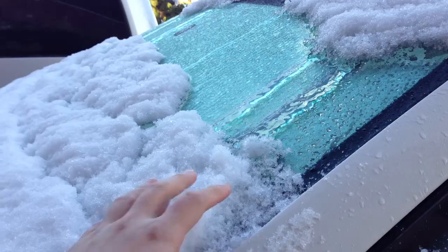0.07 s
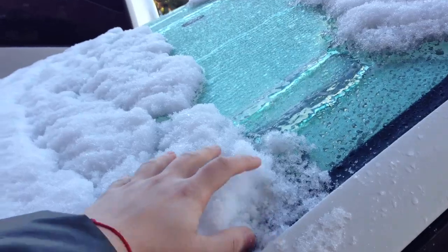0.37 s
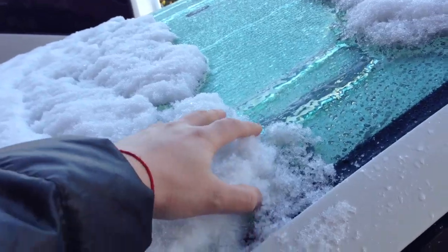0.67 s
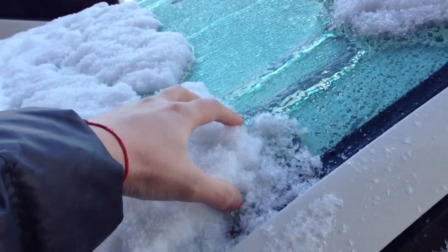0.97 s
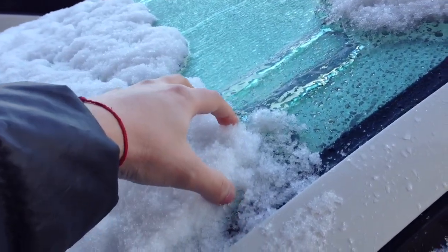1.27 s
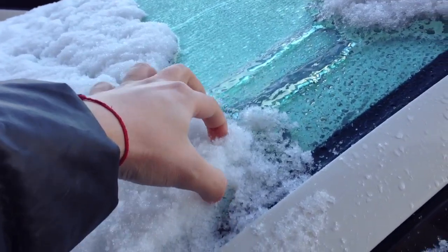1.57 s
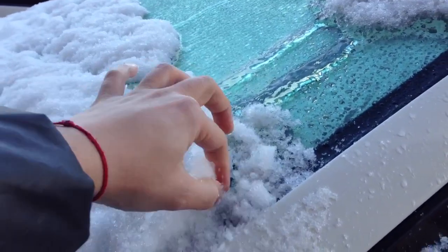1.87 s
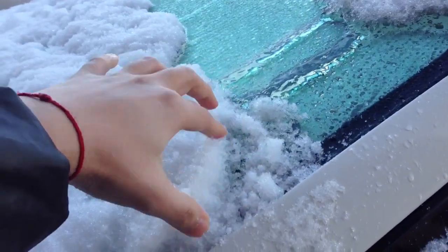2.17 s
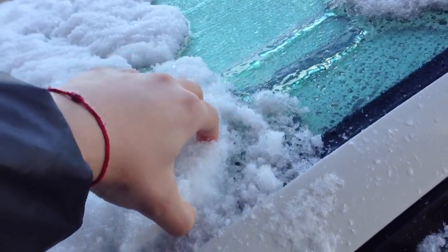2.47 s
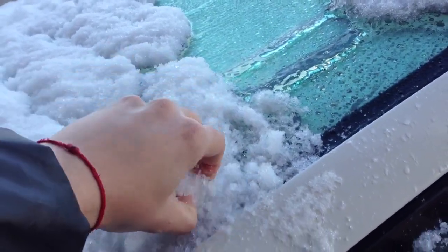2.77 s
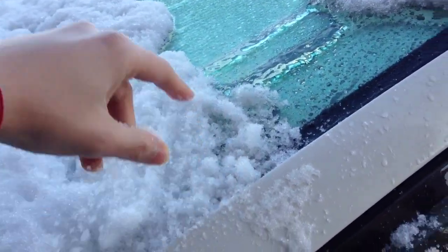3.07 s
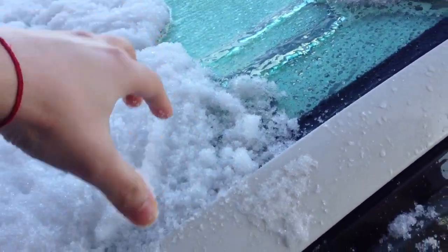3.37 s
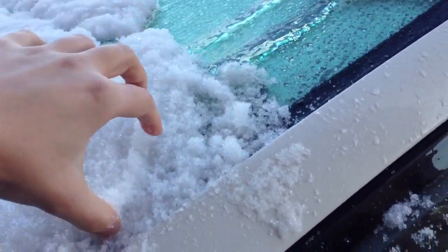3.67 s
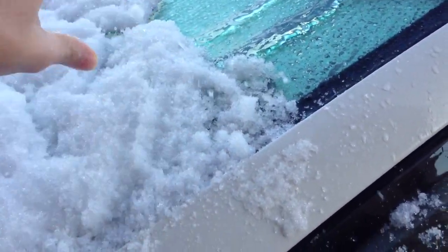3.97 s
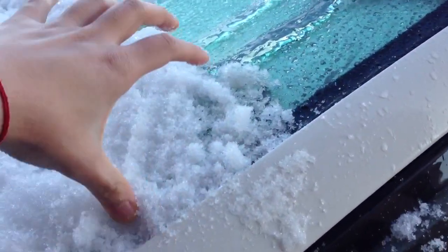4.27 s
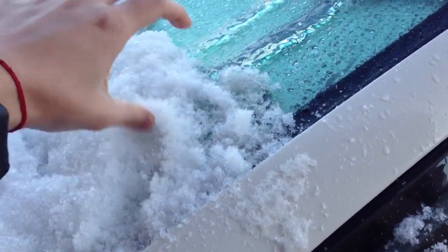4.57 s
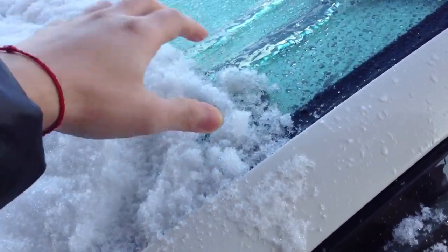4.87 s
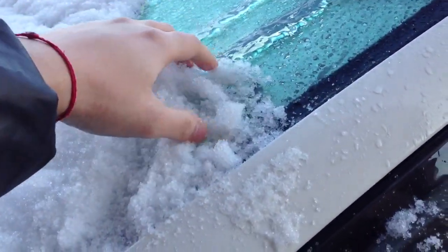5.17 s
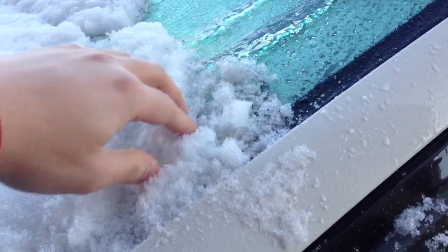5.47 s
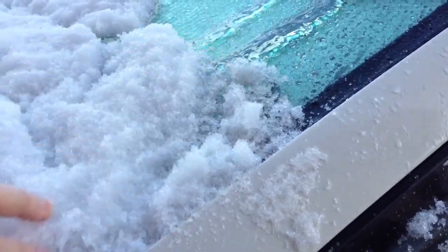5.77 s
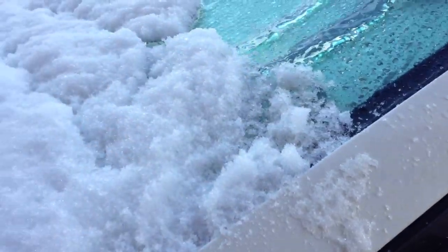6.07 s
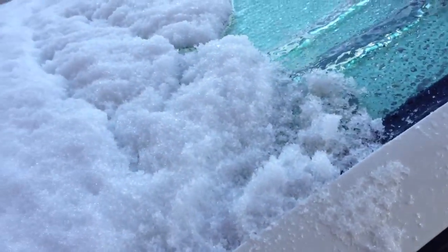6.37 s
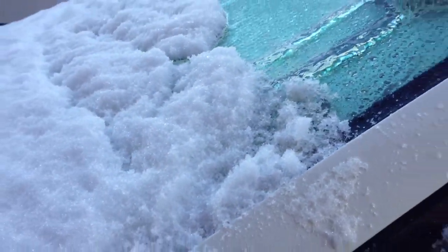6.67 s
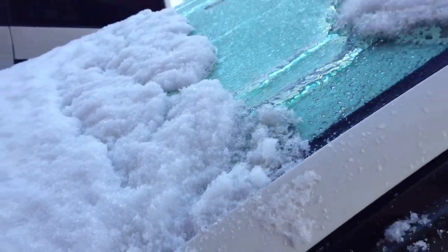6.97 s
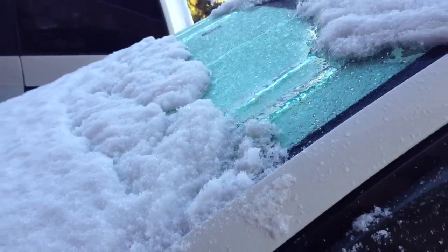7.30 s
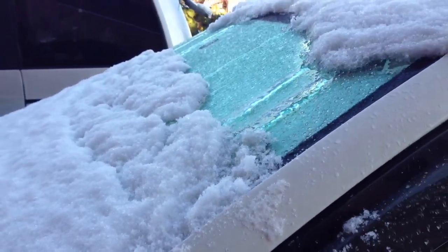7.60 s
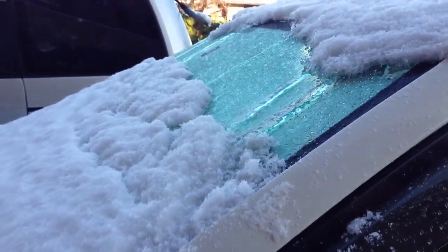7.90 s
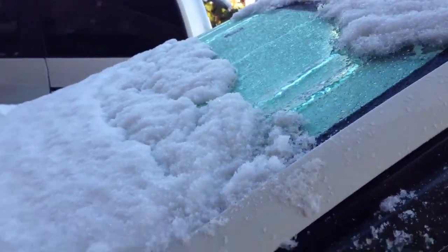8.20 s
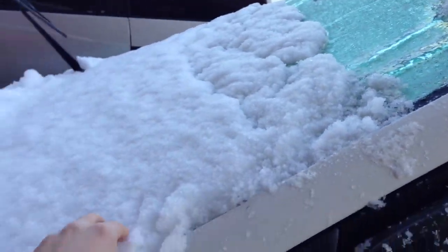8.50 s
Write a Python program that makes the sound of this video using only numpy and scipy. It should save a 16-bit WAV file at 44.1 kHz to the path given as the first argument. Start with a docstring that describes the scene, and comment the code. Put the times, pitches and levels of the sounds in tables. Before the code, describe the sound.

A distant engine hums under a low outdoor rumble while a hand, close to the microphone, claws frozen snow from a car windscreen. Crystals grind over the glass in uneven strokes, the crust snaps and crumbles, and the pane thuds softly now and then. A last few crackles follow before the hand lifts, leaving a quiet sleeve swish and two faint, far whines over the rumble.

```python
"""Bare fingers claw crusty snow and ice off a car windscreen, outdoors and close by.
From the start a distant engine idles in a low rumble, and each stroke grinds loose crystals over the glass.
Soon the crust snaps and crunches, the palm packs soft snow and the pane thuds under the hand.
From about 2 seconds on, a few flakes ring as they break off. Near 6.7 seconds the hand leaves the snow;
a sleeve rustles as the arm draws back, and two faint, far whines swell."""
import sys
import numpy as np
from scipy import signal
from scipy.fft import rfft, irfft, next_fast_len
from scipy.io import wavfile

SR = 44100
rng = np.random.default_rng(int(sys.argv[2]) if len(sys.argv) > 2 else 0)


def inscribe(sig):
    """Save sig as 16-bit PCM at rate SR to the path in sys.argv[1].

    A 1-D sig is mono; a 2-D sig holds one channel per row.
    Samples are clipped to [-1, 1] before scaling.
    """
    pcm = np.round(np.clip(np.atleast_2d(sig).T, -1, 1) * 32767)
    wavfile.write(sys.argv[1], SR, pcm.astype(np.int16))


N = 376613
TIME = np.arange(N) / SR
TOP_HZ = 15550  # upper edge of the sound


def amp(db):
    """Turns decibels into a gain."""
    return 10 ** (np.asarray(db) / 20)


def unit_rms(x):
    """Scales a signal to an average power of 1."""
    return x / np.sqrt(np.mean(x ** 2) + 1e-20)


def over_time(rows):
    """Joins timed values with straight lines."""
    return np.interp(TIME, *np.transpose(rows))


def tone_gain(tone, hz):
    """Reads gains from rows of frequency and dB, on a log-frequency axis."""
    row_hz, db = np.transpose(tone)
    return amp(np.interp(np.log(hz + 1), np.log(row_hz + 1), db))


def coloured(x, tone):
    """Gives a signal a tone colour, at power 1."""
    size = next_fast_len(N)
    gain = tone_gain(tone, np.fft.rfftfreq(size, 1 / SR))
    return unit_rms(irfft(rfft(x, size) * gain, size)[:N])


def wander(hz):
    """A smooth random wobble, up to about the given rate."""
    size = next_fast_len(N)
    smooth = np.exp(-(np.fft.rfftfreq(size, 1 / SR) / hz) ** 2)
    return unit_rms(irfft(rfft(rng.standard_normal(size)) * smooth, size)[:N])


def swells(rows):
    """The gain of soft swells that each rise and fall in a bell shape."""
    return np.sqrt(sum((amp(db) * np.exp(-((TIME - s) / half) ** 2)) ** 2 for s, half, db in rows))


def shortest_click(gain):
    """The shortest click with this spectrum (minimum phase), at energy 1."""
    cepstrum = irfft(np.log(np.maximum(gain / gain.max(), 1e-5)))
    half = len(cepstrum) // 2
    cepstrum[1:half] *= 2
    cepstrum[half + 1:] = 0
    click = irfft(np.exp(rfft(cepstrum)))[:half]
    return click / np.linalg.norm(click)


def fractures(per_s, spread_db):
    """Tiny random cracks of uneven size, at power 1."""
    chance = np.clip(per_s / SR, 1e-4, 1)
    size = unit_rms(amp(spread_db * np.minimum(rng.exponential(1, N), 3.5)))
    return size * rng.choice([-1., 1.], N) * (rng.random(N) < chance) / np.sqrt(chance)


def add(mix, start_s, sound):
    """Mixes a sound in at the given time."""
    part = mix[round(start_s * SR):][:len(sound)]
    part += sound[:len(part)]


# The engine's hum. Each row: pitch in Hz, level in dB compared with the rumble.
ENGINE_TONES = [(88, -26.5), (176, -10.5), (354, -15)]

def idling_engine(waver=0.0127, throb_db=3.0):
    """The engine's speed wavers, bending all its tones together; each throbs on its own."""
    engine_time = np.cumsum(1 + waver * wander(7.4)) / SR
    return sum(amp(db) * unit_rms(amp(throb_db * wander(3.5)) * np.sin(2 * np.pi * hz * engine_time))
               for hz, db in ENGINE_TONES)


# The tone of the outdoor rumble and of the hiss. Each row: frequency in Hz, relative level in dB.
RUMBLE_TONE = [(25, -22), (60, -35), (100, -23), (125, -15.5), (150, -1), (210, 2), (260, -5), (350, -9),
               (500, -12), (700, -16), (1000, -20), (1600, -23.5), (4000, -70)]
HISS_TONE = [(300, -20), (1500, 2.5), (4000, 6), (8000, -1), (15500, -11)]
# How loud the rumble is. Each row: time in seconds, level in dB.
RUMBLE_LEVEL = [(0, -55.5), (2, -53.7), (4, -53.5), (6, -54), (7.2, -55), (8.54, -54)]

def outdoors(hiss_db=-61.5, swell_db=1):
    """A low rumble with the distant engine in it, and a thin hiss."""
    rumble = coloured(rng.standard_normal(N), RUMBLE_TONE) * amp(swell_db * wander(9.0))
    engine = idling_engine()
    hiss = coloured(rng.standard_normal(N), HISS_TONE) * amp(hiss_db)
    return (rumble + engine) * amp(over_time(RUMBLE_LEVEL)) + hiss


# Far whines. Each row: pitch in Hz, width in Hz, resting level in dB,
# then the swell's middle in seconds, half-length in seconds and level in dB.
WHINES = [(860, 60, -72.5, 6.95, .25, -67), (1420, 70, -74, 7.6, .52, -66.5)]

def far_whines():
    """Two fuzzy whines sound faintly all along, and each swells once."""
    out = np.zeros(N)
    for hz, width, rest_db, *swell in WHINES:
        fuzz = wander(width) + 1j * wander(width)
        fuzz /= np.sqrt(abs(fuzz) + 1e-9)  # the pitch wavers more than the level
        whine = unit_rms((fuzz * np.exp(2j * np.pi * hz * TIME)).real)
        out += np.hypot(amp(rest_db), swells([swell])) * whine
    return out


def shifting_snow(band_db=(-72.5, -68.5, -64.5), lift_s=6.65, flutter_db=2):
    """Snow whispers under the hand until it lifts. Gives force in low, middle and high bands."""
    touching = np.clip((lift_s - TIME) * 10, 0, 1)
    cracks = fractures(per_s=20000, spread_db=2)
    return amp(band_db)[:, None] * touching * cracks * amp(flutter_db * wander(14))


# Finger strokes. Each row: start in seconds, length in seconds, level halfway in dB, rise from start
# to end in dB, then low body and high fizz, both in dB compared with that level.
STROKES = [(0.077, 0.15, -58, -0.5, -7, -8), (0.206, 0.05, -52.5, -4, -5, 1.5),
           (.385, 0.17, -57.5, -8, -7.5, -1.5), (0.605, 0.26, -58, -3.5, -1, 0.5),
           (0.918, .21, -65.5, -4, 6, 0), (1.497, 0.1, -54.5, 4, -3, 2.5),
           (1.808, 0.045, -45, -13, -3.5, 1), (1.897, 0.084, -46.5, 5.5, -12, 1.5),
           (1.98, 0.33, -56, -7.5, -14, 2.5), (2.254, 0.37, -53.5, 12.5, -6.5, 2.5),
           (2.574, 0.309, -44.5, 4.5, -6.5, 2), (2.923, 0.1, -44.5, -1.5, -11, 1),
           (3.063, 0.51, -56, -9.5, -15, 2), (3.756, 0.06, -51, 5, -5, -1),
           (3.843, 0.035, -35, 7, -10.5, -2), (3.94, 0.13, -63, 2, -2, 1.5),
           (4.294, 0.067, -50.5, -8, -27, 0), (4.512, 0.072, -38, 13, -12, -3),
           (4.576, 0.078, -31, 4, -11.5, 0), (5.028, 0.043, -59.5, -2, -8, 3.5),
           (5.208, 0.055, -61, 3, -6, 5.5), (5.358, 0.15, -44.5, 5, -3.5, 3.5),
           (5.503, 0.475, -49.5, -6.5, -8.5, 2)]

def finger_strokes(attack_s=0.013, release_s=0.0081, broadening=0.27):
    """Each stroke bites, swells or eases, then dies as the fingers lift. Gives force in three bands."""
    power = np.zeros((3, N))
    for start, length, db, rise_db, body_db, fizz_db in STROKES:
        span = slice(round(start * SR), round((start + length + 8 * release_s) * SR))
        age = np.maximum(TIME[span] - start, 0)
        contact = np.minimum(age / attack_s, 1) * np.exp(-np.maximum(age - length, 0) / release_s)
        push_db = rise_db * (np.minimum(age / length, 1) - .5)
        extra_db = broadening * push_db  # bearing down favours body and fizz
        band_db = np.array([body_db + extra_db, np.zeros(len(age)), fizz_db + extra_db])
        power[:, span] += (contact * amp(db + push_db + band_db)) ** 2
    return np.sqrt(power)


def crystals(cracks, grain_s=0.00064, pitches=17):
    """Gives every crack the short ring of its own crystal, at a random pitch."""
    age = TIME[:SR // 500]
    window = np.sin(np.pi * np.minimum(age / grain_s, 1)) ** 2
    pick, out = rng.integers(0, pitches, N), np.zeros(N)
    for k in range(pitches):
        grain = window * np.cos(2 * np.pi * TOP_HZ * (k + .5) / pitches * age)
        out += np.convolve(cracks * (pick == k), grain / np.linalg.norm(grain))[:N]
    return out * np.sqrt(2 * TOP_HZ / SR)


def grinding(force, per_s=11000, merge_db=-40, slip_hz=130, slip_db=3.5, lump_hz=25, lump_db=0.5):
    """Harder strokes crush more crystals, until single cracks merge into a hiss."""
    level_db = 20 * np.log10(force[1] + 1e-6)
    crush = amp(.5 * (level_db + 45.5))
    merged = 1 / (1 + amp(merge_db - level_db))
    grains = crystals(fractures(per_s * crush, spread_db=4))
    grit = np.sqrt(1 - merged) * grains + np.sqrt(merged) * rng.standard_normal(N)
    depth_db = slip_db / (1 + 0.84 * crush)  # light fingers stick and slip more
    slips = amp(depth_db * wander(slip_hz) - depth_db ** 2 * np.log(10) / 20)  # average power stays 1
    lumps = amp(lump_db * (1.5 - merged) * wander(lump_hz))  # the snow is uneven
    return force * grit * slips * lumps


# The tone of ice ground on glass. Each row: frequency in Hz, relative level in dB.
ICE_TONE = [(60, -40), (150, -9.5), (350, -4), (480, -7), (700, -9), (1000, -5.5), (1400, -9.5),
            (2000, -2.5), (2700, 0.5), (3400, 3), (4800, 2.5), (8000, 3), (15700, -4)]
# Where the glass rings. Each row: pitch in Hz, width in Hz, gain in dB.
GLASS_RINGS = [(1030, 26, 2), (1820, 460, -8.5), (3140, 130, -2), (3510, 89, 0), (4270, 37, -18),
               (5640, 35, -35)]
# How far the fingers have dug through the snow. Each row: time in seconds, share of bare glass.
BARE_GLASS = [(0, .1), (1.8, 0.1), (2.8, 0.43), (3.8, 1), (4.65, 1), (5.3, 0.082), (6.5, 0.15)]

def windscreen(force, body_hz=1700, fizz_hz=6500, echo_db=-11, echo_t60=0.078):
    """The snow-damped pane colours every crack and rings for a moment, most where it is bare."""
    hz = np.fft.rfftfreq(4096, 1 / SR)
    low = 1 / (1 + (hz / body_hz) ** 8)
    high = 1 - 1 / (1 + (hz / fizz_hz) ** 8)
    bands = tone_gain(ICE_TONE, hz) * np.sqrt(np.clip([low, 1 - low - high, high], 0, 1))
    ice = sum(signal.oaconvolve(part, shortest_click(band))[:N] for part, band in zip(force, bands))
    glass = sum(amp(db) * signal.lfilter(*signal.iirpeak(pitch, pitch / width, SR), ice)
                for pitch, width, db in GLASS_RINGS)
    direct = ice + over_time(BARE_GLASS) * glass
    # bending waves come back from the rim, by other paths as the fingers move
    age, returned = TIME[:SR // 20], np.zeros(N)
    for path in range(3):
        echoes = rng.standard_normal(len(age)) * 1000 ** (-age / echo_t60)
        weight = np.sqrt(2 / 3) * np.cos(2 * np.pi * (4 * TIME + path / 3))
        returned += signal.oaconvolve(direct * weight, echoes / np.linalg.norm(echoes))[:N]
    return (direct + amp(echo_db) * returned) / np.sqrt(1 + amp(2 * echo_db))


# Pieces of crust giving way. Each row: start in seconds, length in seconds, level in dB,
# then low body and high fizz, both in dB compared with that level.
CRUNCHES = [(0.391, 0.0045, -48, -8, -1), (.744, 0.0037, -48, -13, 2), (.944, .002, -50.5, 7, -1),
            (1.229, 0.0045, -45, -8, 6), (1.275, 0.0062, -52, -2, 3), (1.315, .005, -50.5, -9, 2),
            (1.358, 0.0068, -47, -12, 2), (1.378, 0.011, -50, -14, 3), (1.462, 0.0084, -36, -11, 3.5),
            (1.516, 0.0039, -37, -14, 3), (1.527, .014, -41, -4.5, 3), (1.585, .008, -37.5, -8, 0),
            (1.653, 0.0095, -46.5, -5, 1), (1.667, 0.013, -40, -9, 0), (1.687, 0.0057, -39.5, -7.5, 0),
            (1.747, 0.006, -28, -11.5, -0.5), (1.772, 0.0086, -31, -14, -1.5), (1.79, 0.0061, -38, -9, -3),
            (1.8, 0.012, -29, -9, -2), (1.835, 0.0068, -40.5, -23, -4), (1.865, 0.0043, -43.5, -14, 1),
            (2.007, .006, -39.5, -28, -3), (2.083, .003, -46, -11, 2), (2.109, 0.0031, -39.5, -14, 2),
            (2.135, 0.0032, -56.5, -11, 20.5), (2.149, .004, -42.5, -27, 2), (2.196, 0.01, -42.5, -14, -2),
            (2.327, 0.0049, -40.5, -4, -0.5), (2.356, .003, -49, -4, 8), (2.438, .003, -44, -13, 2),
            (2.477, 0.0058, -42.5, -4, 8), (2.594, 0.0081, -35.5, -8.5, 2.5),
            (2.612, 0.016, -36.5, -6, -0.5), (2.682, 0.014, -38, -19, 4), (2.717, 0.009, -36.5, -5.5, 6),
            (2.758, 0.02, -38, -8, 4.5), (2.803, 0.0096, -38.5, -1.5, 6), (2.832, 0.0041, -35, -6, 5),
            (2.918, 0.0045, -40, -6.5, 3), (3.03, 0.0026, -43, -21, 9.5), (3.038, 0.0028, -41.5, -14, 5),
            (3.112, 0.0059, -42.5, -19, -17), (3.154, 0.0039, -46, -17, 3), (3.302, 0.0073, -44.5, -20, -8),
            (3.829, 0.013, -38.5, -9.5, -1), (3.867, 0.0071, -34, -27, -1), (4.111, 0.0015, -43.5, -7, 2),
            (4.24, 0.0066, -48, -8, -2.5), (4.425, .008, -41, -11, -3), (4.452, .004, -45.5, -11, -3),
            (4.508, 0.0035, -35.5, -4, -5), (4.528, 0.0055, -37.5, -20, -1), (5.318, 0.0095, -43.5, 2, -6),
            (5.339, 0.01, -45, 0, 0.5), (5.818, 0.015, -46.5, -22, -1), (6.0763, 0.0077, -40, -32, 5),
            (6.094, .012, -47, -20, 1.5), (6.201, 0.0068, -49, -14, -3), (6.281, 0.0057, -39.5, -11, -8),
            (6.41, 0.017, -48, -1, -4), (6.487, 0.0083, -54, -2, -11), (6.555, 0.0044, -44, -15, -4),
            (6.597, 0.022, -54.5, -0.5, -13), (6.982, .003, -47, -1, -1), (8.395, 0.0033, -56, -10, 7)]

def crunching(rise=0.2, fall=1.17, snap_s=0.002):
    """The crust crackles under strain, then breaks in a rush of cracks. Gives force in three bands."""
    cracks, force = fractures(per_s=9000, spread_db=3), np.zeros((3, N))
    for start, length, db, body_db, fizz_db in CRUNCHES + crumbling():
        size = round(length * SR) + 1
        span = slice(round(start * SR) - size, round(start * SR) + 3 * size)
        age = np.arange(-size, 3 * size) / size  # in lengths of the break, like rise and fall
        after = np.maximum(age, 0)
        rush = (1 - np.exp(-after / rise)) * np.exp(-(after / fall) ** 2)
        strain = 0.21 * np.exp(-abs(age) / 0.5)
        burst = cracks[span] * (rush + strain)
        burst /= np.linalg.norm(burst) + 1e-9
        burst[size] = (snap_s / length) ** 2  # the shortest breaks are mostly one clean snap
        burst *= np.sqrt(size) / np.linalg.norm(burst)
        force[:, span] += amp(db + np.array([[body_db], [0], [fizz_db]])) * burst
    return force


def rubbing(moves, tone, flutter_db=2.0):
    """Countless soft little catches merge into a fine rustle."""
    catches = fractures(per_s=16000, spread_db=2)
    return coloured(catches, tone) * swells(moves) * amp(flutter_db * wander(32))


# Presses of the palm. Each row: middle in seconds, half-length in seconds, level in dB.
PRESSES = [(.652, 0.036, -44.5), (.72, 0.073, -61)]
# The dull tone of packing snow. Each row: frequency in Hz, relative level in dB.
SNOW_TONE = [(100, -17), (300, 7), (450, 8), (750, 3.5), (1100, -33), (1700, -1), (2500, 3), (3500, -4.5),
             (7000, -14), (15000, -28)]

def packing_snow():
    """Soft snow rubs together as the palm packs it."""
    return rubbing(PRESSES, SNOW_TONE)


# The hand bearing down on the pane. Each row: start in seconds, strength in dB.
PUSHES = [(0.646, -57), (1.508, -39), (1.67, -37.5), (1.753, -36), (1.8, -35.5), (2.798, -32), (2.832, -43),
          (4.624, -46), (5.323, -38), (5.34, -38.5)]
# The pane's low notes. Each row: pitch in Hz, relative level in dB, seconds to fade by 60 dB.
PANE_NOTES = [(151, -17, 0.2), (177.5, -3, 0.19), (219, -3, 0.11), (299, -11.5, 0.2), (340, -2, 0.094),
              (463, 5, 0.031)]

def thuds(rise_s=0.0089):
    """A soft push sets the whole pane bending."""
    age, out = TIME[:SR // 4], np.zeros(N)
    for start, push_db in PUSHES:
        bend = sum(amp(db - 60 * age / t60) * np.sin(2 * np.pi * (hz * age + rng.random()))
                   for hz, db, t60 in PANE_NOTES)
        add(out, start, amp(push_db) * (1 - np.exp(-age / rise_s)) * bend)
    return out


# Spells of crumbling crust. Each row: start in seconds, length in seconds, typical level in dB.
CRUMBLE_SPELLS = [(1.2, 0.27, -48.5), (2.269, .3, -42.5), (2.646, .55, -43), (4.337, 0.23, -52)]

def crumbling(count=8, spread_db=3, break_s=0.0016, body_db=-16.5, fizz_db=4.6):
    """The crust crumbles in little random breaks. Gives more rows like those of CRUNCHES."""
    breaks = []
    for start, length, typical_db in CRUMBLE_SPELLS:
        for k, (when, strength) in enumerate(rng.random((count, 2))):
            db = typical_db + spread_db * (2 * strength - 1)
            breaks.append((start + length * (k + when) / count, break_s, db, body_db, fizz_db))
    return breaks


# Flakes snapping off. Each row: start in seconds, pitch in Hz, level in dB.
FLAKES = [(2.136, 10000, -35), (2.198, 4420, -27.5), (2.327, 2560, -29), (3.03, 9500, -31),
          (3.039, 5200, -30), (3.111, 4620, -28), (4.426, 3130, -32), (4.454, 3040, -31),
          (6.076, 5580, -25)]

def flakes(t60=0.0094, rise_s=0.00015):
    """A freed flake of ice rings for a few milliseconds."""
    age, out = TIME[:SR // 30], np.zeros(N)
    for start, hz, db in FLAKES:
        envelope = amp(db - 60 * age / t60) * (1 - np.exp(-age / rise_s))
        add(out, start, envelope * np.sin(2 * np.pi * hz * age))
    return out


# Swishes of the sleeve. Each row: middle in seconds, half-length in seconds, level in dB.
SWISHES = [(7.3, 0.57, -59), (7.69, 0.041, -52), (8.22, 0.25, -54.5)]
# The tone of its cloth. Each row: frequency in Hz, relative level in dB.
CLOTH_TONE = [(500, -16), (1500, -9.5), (2500, -6.5), (4500, -6), (7000, -8), (10000, -13.5), (15500, -21)]

def sleeve():
    """The jacket's cloth rubs as the arm draws back."""
    return rubbing(SWISHES, CLOTH_TONE)


def scene():
    """Ice and snow on the glass, the sleeve and the outdoors, in mono."""
    force = grinding(finger_strokes()) + crunching() + shifting_snow()
    ice = windscreen(force) + flakes() + thuds()
    return (ice + packing_snow() + sleeve() + outdoors() + far_whines())[None]


def record(dry, start_s=0.083, low_cut_hz=55):
    """The sound opens a moment in and loses its deepest bass and highest treble."""
    opened = dry * np.clip((TIME - start_s) / .003, 0, 1)
    bass_cut = signal.butter(2, low_cut_hz, "highpass", fs=SR, output="sos")
    treble_cut = signal.firwin(401, TOP_HZ, window=("kaiser", 8), fs=SR)
    return signal.oaconvolve(signal.sosfilt(bass_cut, opened), treble_cut[None], "same")


dry = scene()
out = record(dry)
inscribe(out)
```